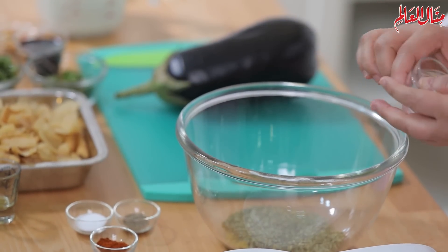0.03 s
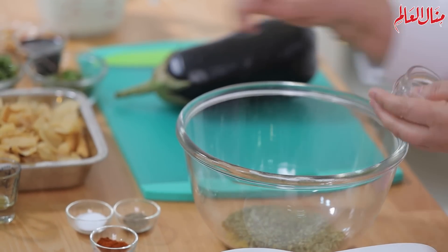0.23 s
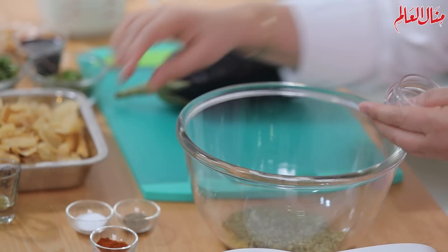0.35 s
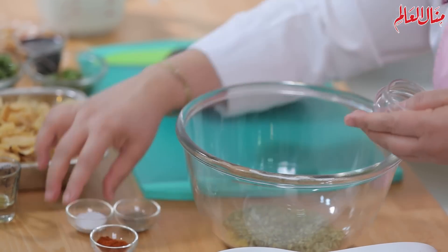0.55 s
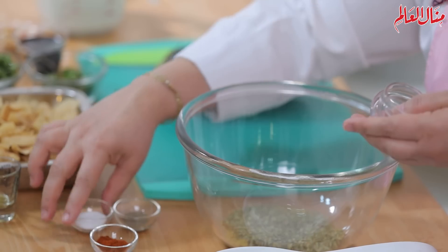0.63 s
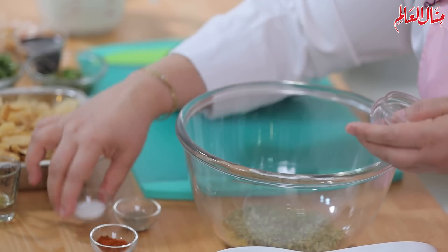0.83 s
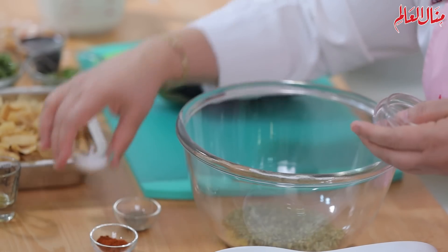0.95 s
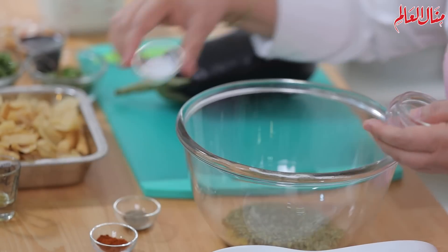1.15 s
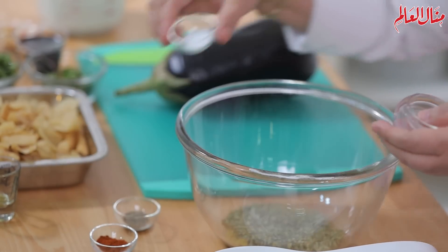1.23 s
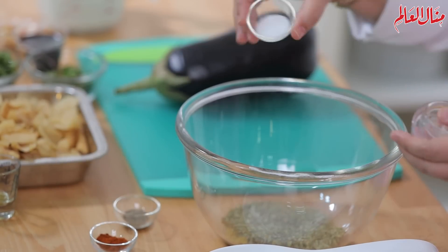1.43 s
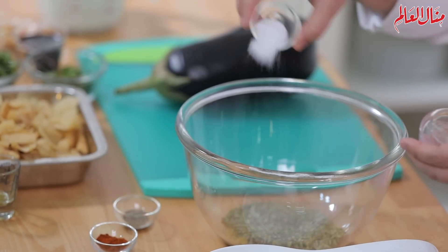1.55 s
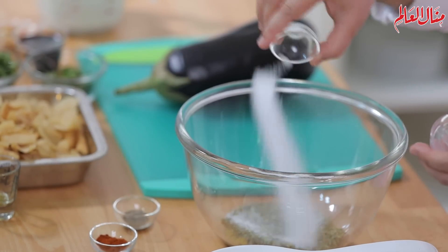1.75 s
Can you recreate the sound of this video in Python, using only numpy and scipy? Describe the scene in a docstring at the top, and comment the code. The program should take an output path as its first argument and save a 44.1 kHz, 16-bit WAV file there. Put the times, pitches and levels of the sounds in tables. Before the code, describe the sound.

Small glass bowls clack sharply together in the hand, then knock again more softly. Another bowl clinks and rings lightly as it is lifted from a wooden counter, and a sleeve rustles faintly in the quiet kitchen.

```python
"""A quiet kitchen, where small glass spice bowls are handled over a large glass mixing bowl.
An emptied bowl clacks onto the stack held in one hand and the stack knocks once more, both damped
by the fingers. The salt bowl is lifted from the wooden counter: it chatters against its neighbour
and rings freely. A sleeve rustles as the arm swings back; a faint room tail follows each contact."""
import sys
import numpy as np
from scipy import signal
from scipy.fft import rfft, irfft
from scipy.io import wavfile

SR = 44100
rng = np.random.default_rng(int(sys.argv[2]) if len(sys.argv) > 2 else 0)


def transcribe(signal):
    """Save signal, clipped to [-1, 1], as a 16-bit WAV file at the path in sys.argv[1]."""
    frames = np.atleast_2d(signal).T
    limited = np.clip(frames, -1, 1)
    pcm = np.round(limited * 32767).astype(np.int16)
    wavfile.write(sys.argv[1], SR, pcm)


N = 79380


def amp(db):
    """Decibels to gain."""
    return 10 ** (np.asarray(db) / 20)


def curve_at(points, hz):
    """Table value on a log-frequency axis."""
    points_hz, values = np.transpose(points)
    return np.interp(np.log(hz + 1), np.log(points_hz + 1), values)


def add(mix, start_s, sound):
    """Mixes a sound in at start_s."""
    part = mix[max(round(start_s * SR), 0):][:len(sound)]
    part += sound[:len(part)]


def noise(spectrum):
    """Shaped noise, rms 1."""
    gain = amp(curve_at(spectrum, np.fft.rfftfreq(N, 1 / SR)))
    shaped = irfft(rfft(rng.standard_normal(N)) * gain, N)
    return shaped / shaped.std()


def ring(modes):
    """Struck object: decaying sines, neighbouring modes in opposite phase."""
    t = np.arange(SR // 2) / SR
    return sum((-1) ** k * amp(db) * np.exp(-np.log(1000) * t / t60_s) * np.sin(2 * np.pi * hz * t)
               for k, (hz, db, t60_s) in enumerate(modes))


# Room tone spectrum: freq_hz, density_db
ROOM_TONE_SPECTRUM = [(20, -12), (45, -1), (100, -2), (180, -3), (280, -4.5), (350, -8), (500, -8.5),
                      (700, -10.5), (900, -15.5), (1600, -19.5), (2200, -21), (3800, -27.5), (6000, -30.5),
                      (10000, -33), (16000, -35.5)]

def room_tone(level_db=-60.5):
    """Steady low noise."""
    return amp(level_db) * noise(ROOM_TONE_SPECTRUM)


# Low bumps: centre_s, level_db, half_width_s
BUMPS = [(1.215, -56, .02), (1.41, -62, .06), (1.78, -55, .04)]

def bumps(pitch_hz=44):
    """Soft low bumps: a sine under bell-shaped envelopes."""
    t = np.arange(N) / SR
    return sum(amp(db) * np.exp(-((t - at_s) / width_s) ** 2) * np.sin(2 * np.pi * pitch_hz * (t - at_s))
               for at_s, db, width_s in BUMPS)


# Cloth spectrum: freq_hz, density_db
SLEEVE_SPECTRUM = [(30, -10), (130, 0), (320, 2), (800, -8), (2000, -13), (4000, -21.5), (9000, -29),
                   (16000, -35)]
# Rustle envelope: time_s, level_db
SLEEVE_ENVELOPE = [(0, -66), (.3, -65), (.55, -63), (.68, -76), (.8, -67), (1.08, -72), (1.18, -67),
                   (1.22, -58.5), (1.255, -65), (1.31, -59.5), (1.48, -64), (1.58, -72), (1.62, -64),
                   (1.66, -74), (1.8, -80)]

def sleeve():
    """Cloth noise that swells as the arm moves."""
    level_db = np.interp(np.arange(N) / SR, *np.transpose(SLEEVE_ENVELOPE))
    return amp(level_db) * noise(SLEEVE_SPECTRUM)


# Room decay: freq_hz, t60_s
ROOM_DECAY = [(300, .55), (1000, .7), (1600, 1.0), (2600, .92), (4500, .68), (8000, .56), (10000, .46),
              (14000, .42)]
# Tail colour: freq_hz, gain_db
ROOM_COLOUR = [(300, -14), (1000, -22), (1550, -19), (2100, -26), (2800, -23), (3600, -26.5), (5000, -26),
               (7500, -19), (10000, -21), (14000, -20.5)]

def room_tail():
    """Impulse response of dense reflections, each band decaying at its own rate."""
    hz, frame_s, bands = signal.stft(rng.standard_normal(SR), SR, nperseg=256)
    rate_per_s = np.log(1000) / curve_at(ROOM_DECAY, hz)[:, None]
    decay = np.exp(-rate_per_s * frame_s) * np.sqrt(2 * rate_per_s / SR)
    colour = amp(curve_at(ROOM_COLOUR, hz))[:, None]
    tail = signal.istft(bands * decay * colour, SR, nperseg=256)[1][:SR]
    fade_in = np.clip((np.arange(SR) / SR - .005) / .008, 0, 1)
    return tail * fade_in


# Early reflections: delay_s, gain_db
ECHOES = [(.0125, -33), (.0145, -32), (.0212, -35), (.030, -35)]

def room(sound):
    """Echoes off near surfaces plus the diffuse tail."""
    out = signal.fftconvolve(sound, room_tail())[:N]
    for delay_s, db in ECHOES:
        add(out, delay_s, amp(db) * sound)
    return out


# Fading clink: freq_hz, gain_db, t60_s
CLINK_MODES = [(1400, -8, .012), (1580, -4, .022), (1900, 2, .008), (2130, -7, .012), (2546, -15, .06),
               (2850, -4, .005), (4130, -7, .04), (4290, -8, .035), (4850, -3, .007), (7000, -11, .003),
               (9190, -19, .04), (9650, -9, .006)]

def fading_clink(gain_db=-7, age_s=.06):
    """Room tail of a clink struck age_s before the start."""
    out = np.zeros(N)
    tail = signal.fftconvolve(ring(CLINK_MODES), room_tail())
    add(out, 0, amp(gain_db) * tail[round(age_s * SR):])
    return out


# Light glass touches: start_s, level_db, pitch_hz
TOUCHES = [(.1152, -42, 1950), (.535, -49, 2600), (.9128, -50, 2300), (.9398, -47, 2050),
           (1.010, -56, 2400), (1.550, -54, 2200)]

def touches(t60_s=.008, upper_ratio=1.5, upper_db=-12):
    """Damped two-mode ticks of glass shifting in the hand."""
    out = np.zeros(N)
    for start_s, db, hz in TOUCHES:
        add(out, start_s, ring([(hz, db, t60_s), (hz * upper_ratio, db + upper_db, t60_s)]))
    return out


# Glass-on-glass friction: freq_hz, density_db
SKID_SPECTRUM = [(60, -9), (400, -4), (750, -2), (950, -9), (1250, 2), (1600, 5), (2900, 3), (3600, -1),
                 (5500, 0), (6600, -2), (8000, -4), (10200, -2), (11400, -9), (12200, -2), (14000, -5),
                 (15000, -17), (16000, -27)]

def skid(peak_s, sharpness=2.2):
    """Milliseconds of noise from two glass surfaces grating."""
    phase = np.arange(SR // 20) / SR / peak_s
    envelope = (phase * np.exp(1 - phase)) ** sharpness
    return noise(SKID_SPECTRUM)[:len(phase)] * envelope


# Free small bowl: freq_hz, gain_db, t60_s
BOWL_MODES = [(3020, -1, .010), (4400, -14, .035), (4560, -9, .08), (4660, -12, .12), (4780, -9, .08),
              (4852, -1, .14), (4905, -15, .24), (5150, -11, .015), (5900, -5, .006), (7200, -14, .008),
              (10960, -24, .06), (11290, -16, .07), (12200, -24, .025)]
# Wooden counter: freq_hz, gain_db, t60_s
COUNTER_MODES = [(95, -11, .12), (220, -13, .06), (475, 2, .13), (540, -5, .08), (705, -6, .11),
                 (970, 0, .07), (2200, -2, .006)]
# Contacts during the lift: start_s, glass_db, counter_db
CHATTER = [(.8130, -72, -58), (.8187, -38, -46), (.8246, -45, -52), (.8305, -52, -60), (.8380, -49, -63)]

def salt_bowl(skid_gain_db=-12.5):
    """Quick contacts scrape and ring the free bowl and thump the counter."""
    glass, wood = np.zeros(N), np.zeros(N)
    for start_s, glass_db, counter_db in CHATTER:
        add(glass, start_s, amp(glass_db) * ring(BOWL_MODES))
        add(glass, start_s, amp(glass_db + skid_gain_db) * skid(peak_s=.0007))
        add(wood, start_s, amp(counter_db) * ring(COUNTER_MODES))
    return glass, wood


# Held stack, sharp clack: freq_hz, gain_db, t60_s
CLACK_MODES = [(1480, -10, .011), (1780, -7, .010), (2185, 1, .013), (2440, -11, .012), (2810, -4, .011),
               (3300, -16, .009), (4140, -15, .012), (4620, -13, .014), (5015, -7.5, .012),
               (5340, -15, .011), (6300, -25, .008), (7280, -22, .011), (9190, -22, .012),
               (10000, -19, .012), (10280, -16, .012), (12050, -23, .011), (13600, -23, .008)]
# Held stack, dull knock: freq_hz, gain_db, t60_s
KNOCK_MODES = [(1310, -5, .014), (1560, 0, .015), (1850, -9, .012), (2200, -17, .008), (2520, -13, .010),
               (2930, -22, .011), (4170, -25, .012), (4680, -21, .007), (5400, -25, .005),
               (6380, -25, .010), (7200, -33, .009)]
# Blows on the stack: start_s, tick_db, tick_hz, ring_db, ring_delay_s, ring_rise_s, skid_db
CLACK_BLOW = (.2074, -1, 2650, 5.8, .0006, .0027, -20.5)
KNOCK_BLOW = (.4549, -22, 2150, -17.5, .0001, .0010, -57)

def held_stack(blow, modes, tick_rise_s=.0005):
    """Hard contact tick, brief skid, and a ring that builds until the fingers choke it."""
    start_s, tick_db, tick_hz, ring_db, ring_delay_s, ring_rise_s, skid_db = blow
    t = np.arange(SR // 2) / SR
    tick_envelope = np.sin(np.pi * np.minimum(t / tick_rise_s / 2, 1)) ** 2
    tick = tick_envelope * np.cos(2 * np.pi * tick_hz * (t - tick_rise_s))
    ring_rise = 1 - np.exp(-(t / ring_rise_s) ** 2)
    out = np.zeros(N)
    add(out, start_s, amp(tick_db) * tick)
    add(out, start_s + ring_delay_s, amp(ring_db) * ring_rise * ring(modes))
    add(out, start_s + ring_delay_s, amp(skid_db) * skid(peak_s=.0022))
    return out


def scene(bowl_send_db=13):
    """Glass and counter in the room, over the background; mono."""
    bowl, counter = salt_bowl()
    stack = held_stack(CLACK_BLOW, CLACK_MODES) + held_stack(KNOCK_BLOW, KNOCK_MODES)
    damped = stack + touches() + counter
    reflections = room(damped + amp(bowl_send_db) * bowl)
    background = fading_clink() + sleeve() + bumps() + room_tone()
    return (background + reflections + damped + bowl)[None]


def record(dry):
    """Steep low-pass."""
    cutoff_hz = 15800
    lowpass = signal.firwin(511, cutoff_hz, window=("kaiser", 9), fs=SR)
    return signal.oaconvolve(dry, lowpass[None], "same")


dry = scene()
out = record(dry)
transcribe(out)
```